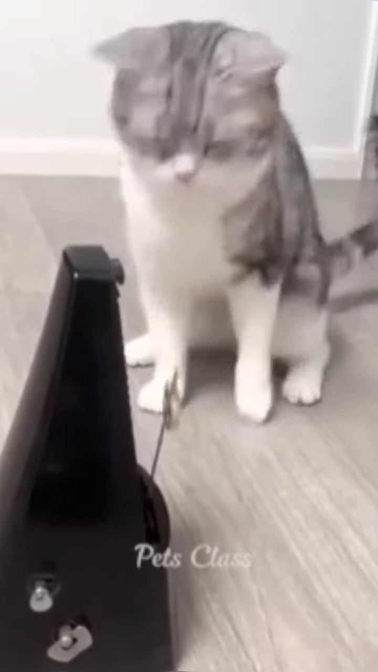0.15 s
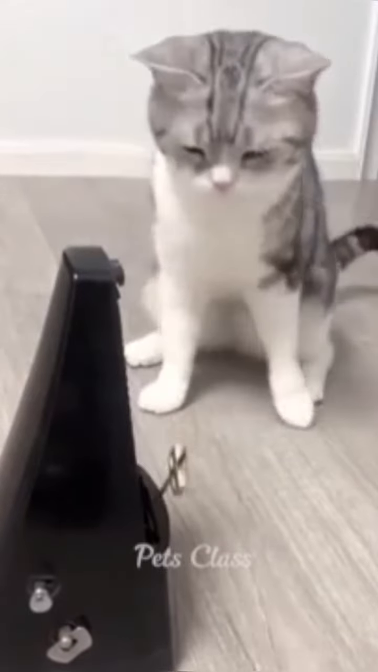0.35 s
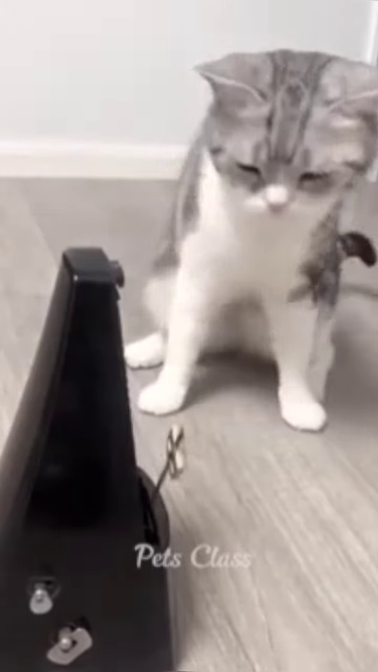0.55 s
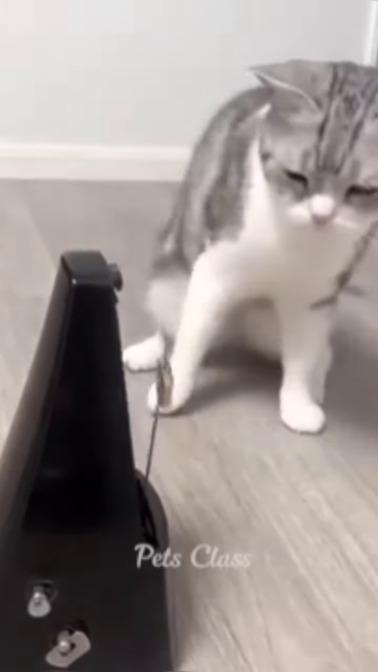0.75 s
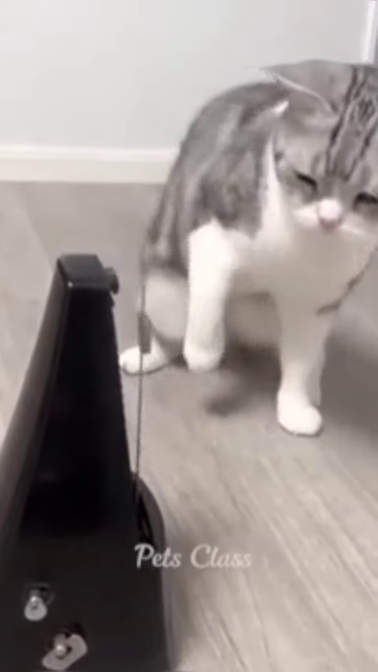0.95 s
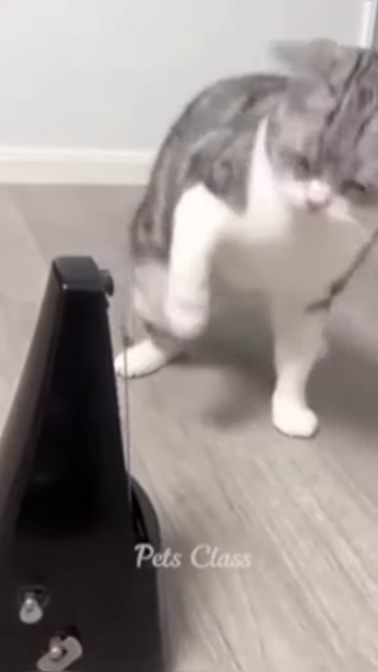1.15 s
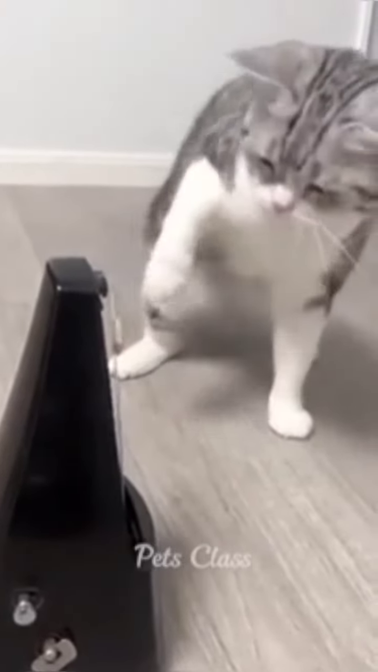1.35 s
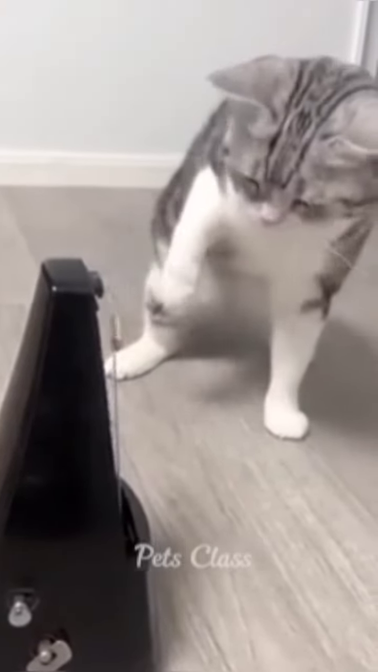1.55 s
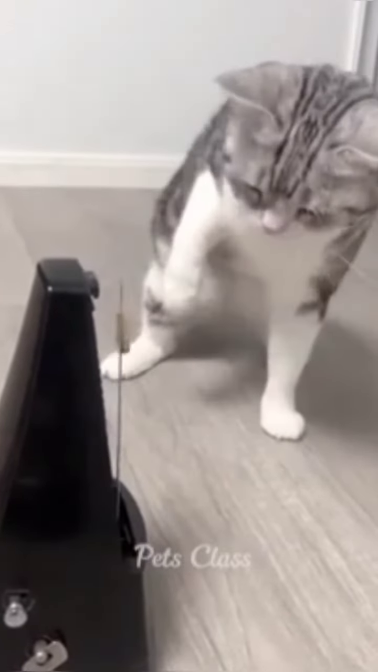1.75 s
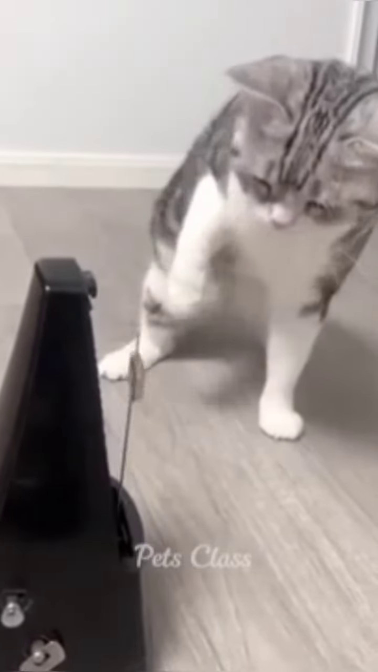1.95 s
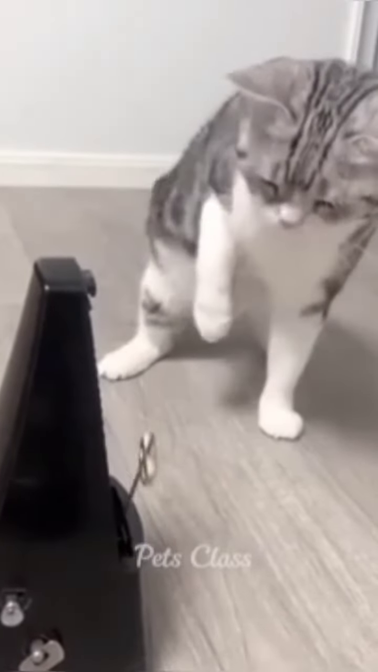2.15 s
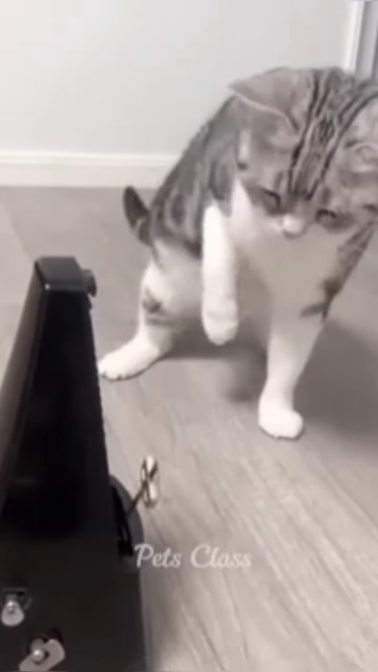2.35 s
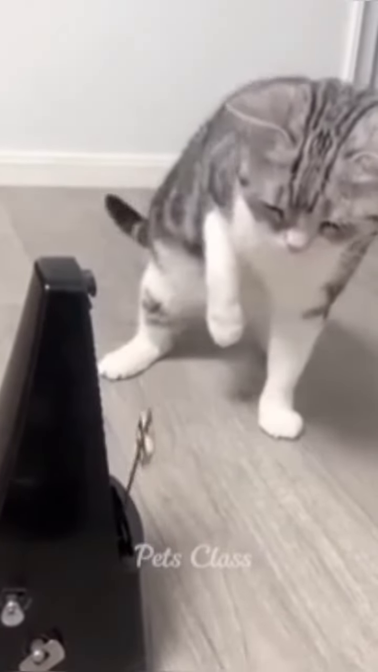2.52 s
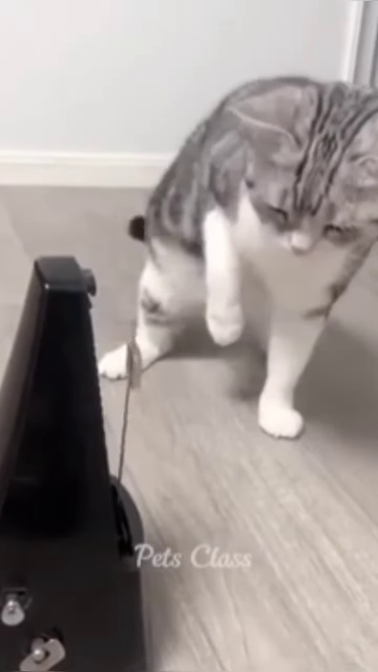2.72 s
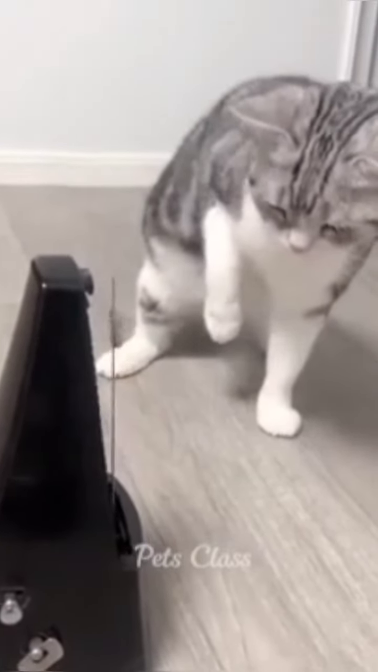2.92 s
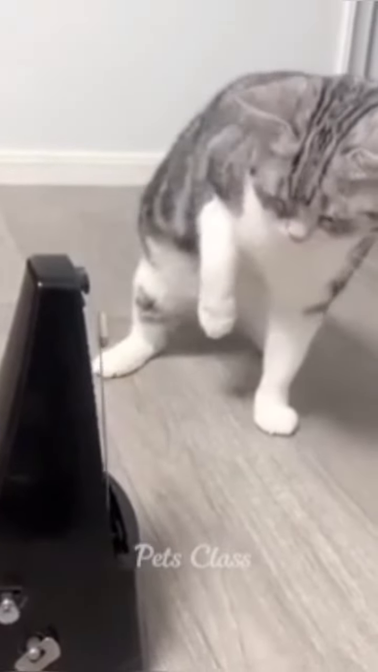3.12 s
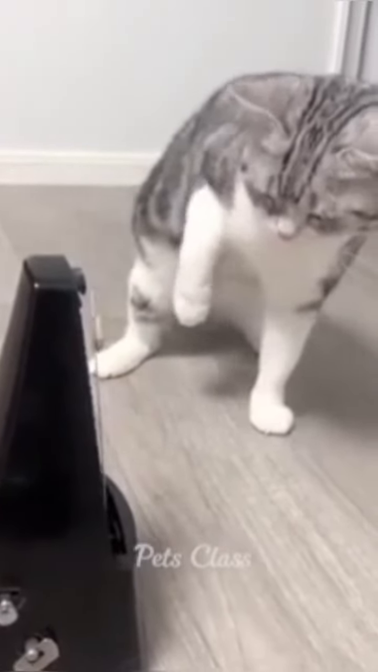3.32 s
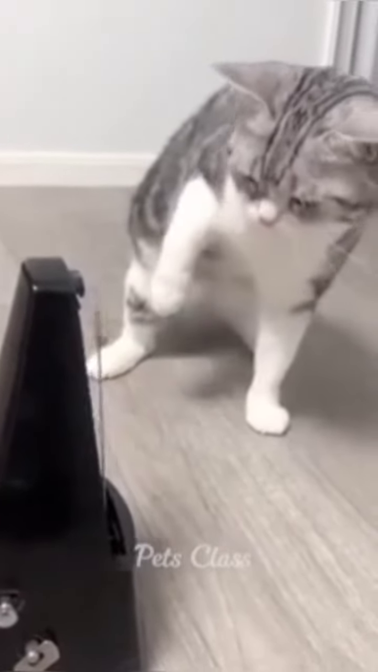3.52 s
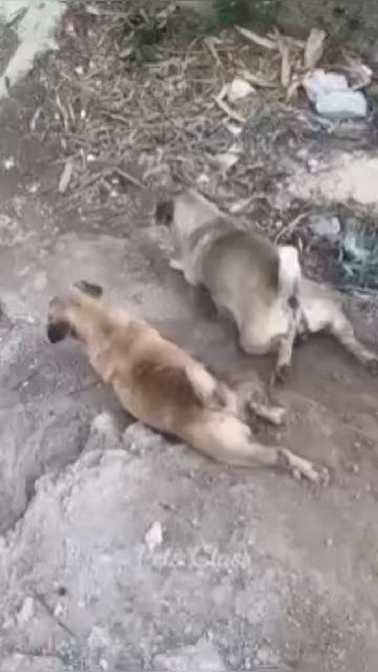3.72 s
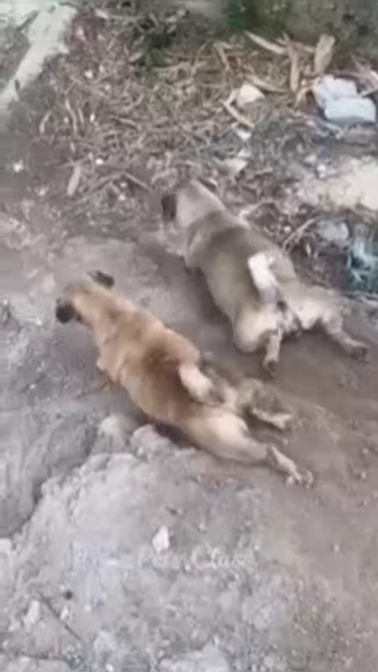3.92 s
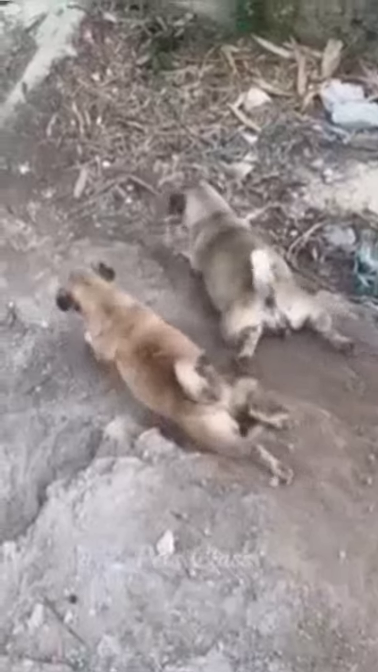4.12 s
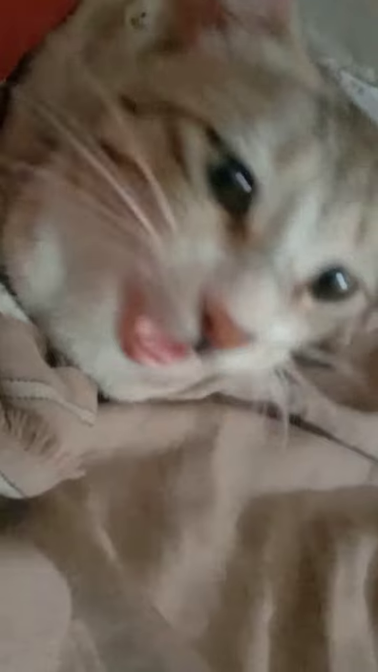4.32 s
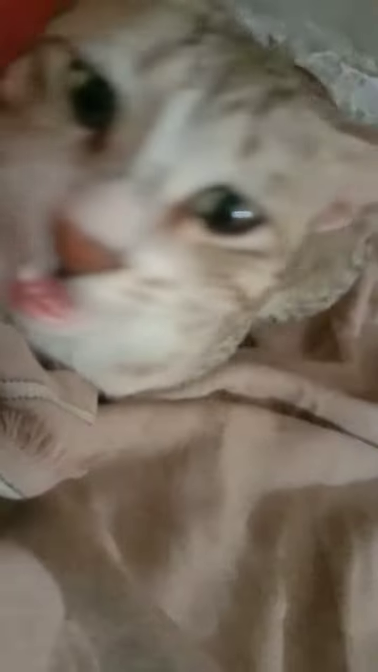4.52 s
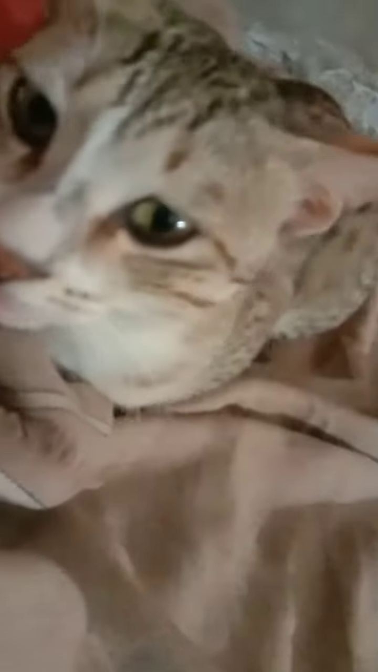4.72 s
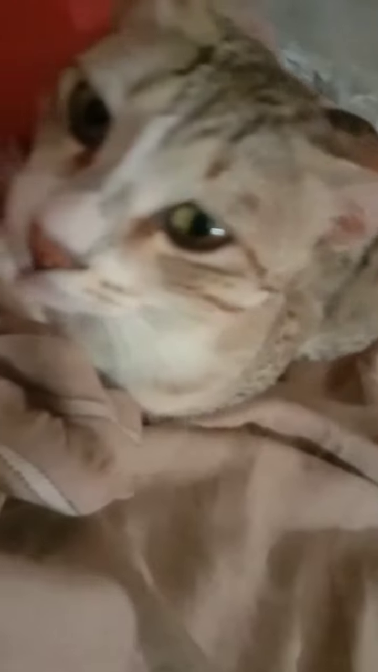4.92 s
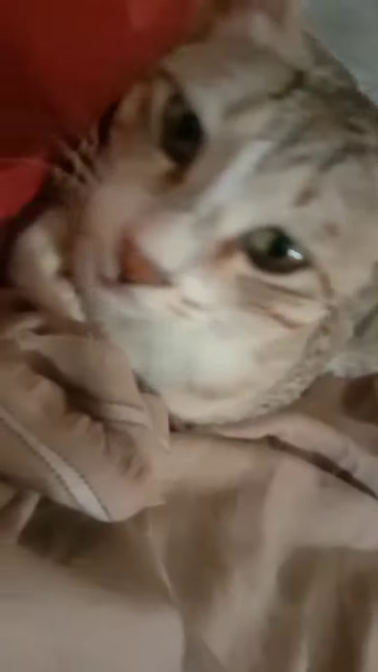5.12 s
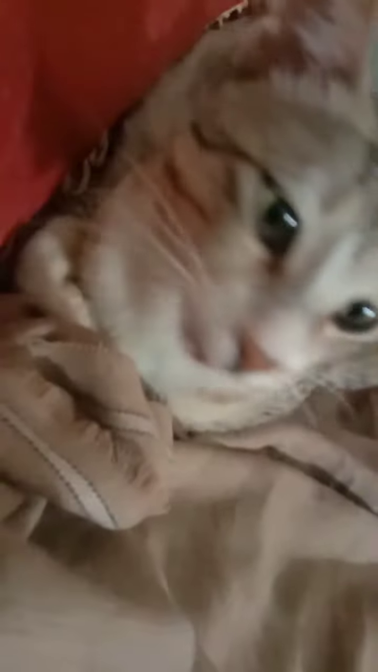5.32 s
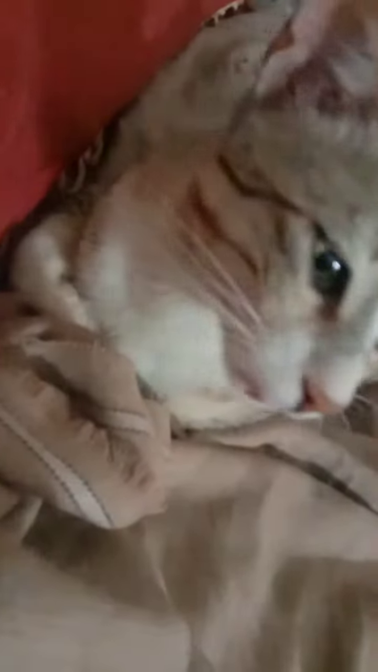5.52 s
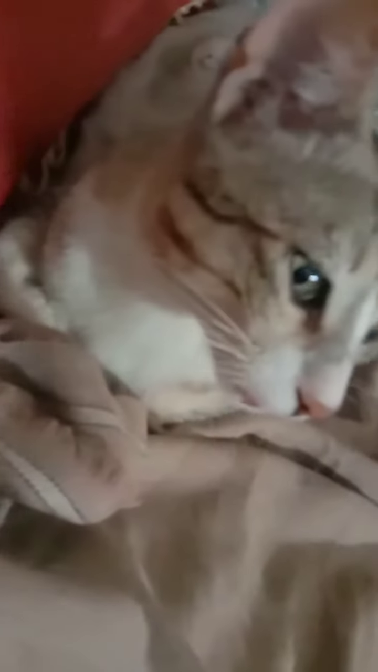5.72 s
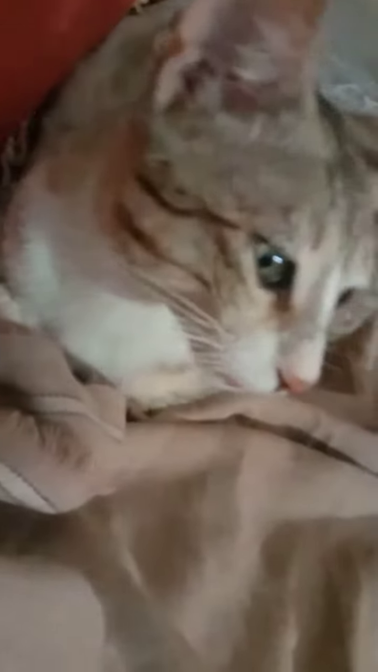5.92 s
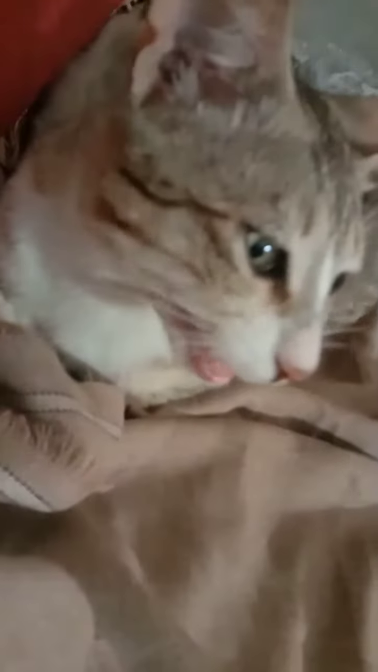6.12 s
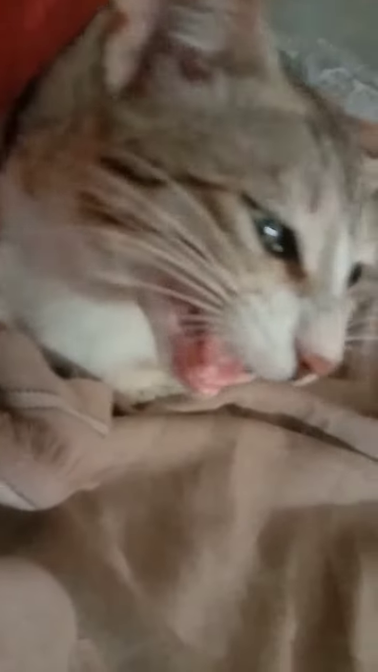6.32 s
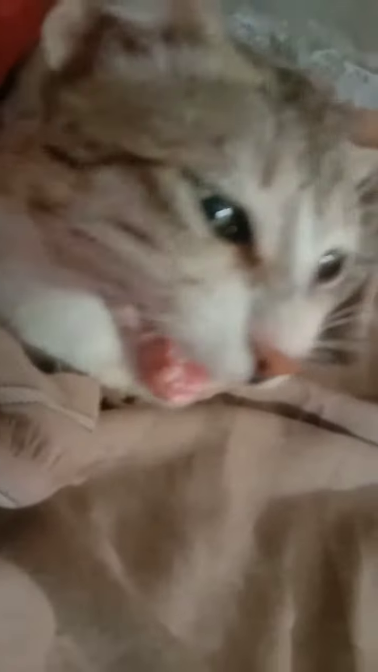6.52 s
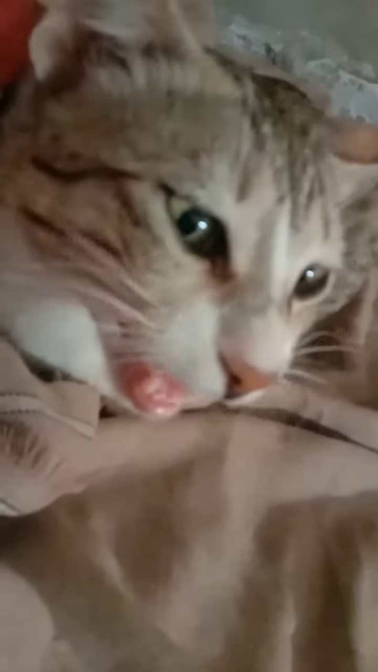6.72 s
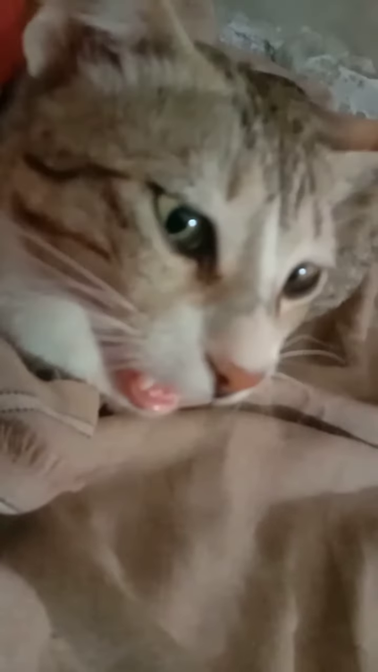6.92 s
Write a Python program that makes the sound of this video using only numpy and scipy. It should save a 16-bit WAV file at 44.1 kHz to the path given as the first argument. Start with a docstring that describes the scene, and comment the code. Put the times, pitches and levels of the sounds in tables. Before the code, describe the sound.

In a bare, reverberant room, a mechanical metronome gives four sharp, loud ticks roughly one second apart, each with a hollow case ring and short echo over faint hum and buzz. A soft thump follows the last tick. Everything cuts to brief silence, then a cat close to the microphone meows, shifts on cloth with rustles and dull bumps, and begins a second, louder meow.

```python
"""A clockwork metronome ticks four times in a bare room: each blow cracks, rings its case, echoes and reverberates.
Low hum, air noise and a thin buzz lie beneath it; a soft thump, a sinking tone, follows the last tick.
After a moment of silence, a cat on a blanket close to the microphone meows, its harmonics gliding through
moving mouth resonances. It shifts on the cloth, heard as strokes of coloured noise with dull bumps,
and starts a second, louder meow. Two faint clicks are short bursts of filtered noise."""
import sys
import numpy as np
from scipy import signal
from scipy.fft import rfft, irfft, next_fast_len
from scipy.io import wavfile
from scipy.ndimage import uniform_filter1d

SR = 44100
rng = np.random.default_rng(int(sys.argv[2]) if len(sys.argv) > 2 else 0)


def inscribe(sig):
    """Save sig as 16-bit PCM at rate SR to the path in sys.argv[1].

    A 1-D sig is mono; a 2-D sig holds one channel per row.
    Samples are clipped to [-1, 1] before scaling.
    """
    pcm = np.round(np.clip(np.atleast_2d(sig).T, -1, 1) * 32767)
    wavfile.write(sys.argv[1], SR, pcm.astype(np.int16))


N = 306495
TIME = np.arange(N) / SR
ROOM_END_S, BED_START_S = 3.815, 4.286
TOP_HZ = 15600  # upper limit of the microphone's range


def undb(db):
    """Decibels to gain."""
    return 10 ** (np.asarray(db) / 20)


def unit(x):
    """Scale to rms 1."""
    return x / np.sqrt(np.mean(x ** 2))


def lookup(table, hz):
    """Read (Hz, value) points on a log-frequency axis."""
    points, values = np.transpose(table)
    return np.interp(np.log(np.maximum(hz, 1)), np.log(points), values)


def noise(colour):
    """Noise of rms 1 with the given colour."""
    size = next_fast_len(N, real=True)
    white = rfft(rng.standard_normal(size))
    gains = undb(lookup(colour, np.fft.rfftfreq(size, 1 / SR)))
    return unit(irfft(white * gains, size)[:N])


def walk(rate):
    """Smoothed random steps of rms 1 that change about rate times a second."""
    step = max(int(SR / rate), 1)
    held = rng.standard_normal(N)[np.arange(N) // step]
    return unit(uniform_filter1d(held, step))


def add(out, s, sound):
    """Mix a sound in at time s."""
    i = int(round(s * SR))
    out[i:i + len(sound)] += sound[:len(out) - i]


def patchy(x, spread_db, rate, count=10):
    """Let each two-thirds-octave band of a sound swell and fade on its own."""
    size = next_fast_len(N, real=True)
    spectrum, hz = rfft(x, size), np.fft.rfftfreq(size, 1 / SR)
    centres = np.geomspace(100, 6400, count)
    # overlapping band weights that add up to 1
    bands = (irfft(spectrum * lookup(np.c_[centres, row], hz), size)[:N] for row in np.eye(count))
    return sum(band * undb(spread_db * walk(rate)) for band in bands)


def room_tone(air_db=-46, waver_db=2.0, buzz_db=-61.0, buzz_hz=199.96):
    """Steady air noise, a wavering hum and a thin electric buzz of evenly spaced pulses."""
    # colour of the room's air: (frequency [Hz], relative level [dB per Hz])
    air_colour = [(20, -47.5), (35, -25), (50, -11.5), (72, -12.5), (120, -7.5), (165, -9.5), (204, -7.5),
                  (310, -15.5), (1080, -13.5), (2300, -26.5), (3630, -32.5), (6050, -39.5), (7500, -40.5),
                  (15500, -50)]
    # hum tones: (frequency [Hz], rms level before wavering [dB])
    hum_tones = [(69.8, -49.5), (99.6, -55.5)]
    # colour of the mains buzz: (frequency [Hz], relative level [dB])
    buzz_colour = [(1500, -11.5), (2900, 3), (3400, -8.5), (4100, -0.5), (4800, -16), (6200, -12.5),
                   (7400, -5.5), (8400, -12.5), (9000, -15), (10000, -21.5), (15000, -30.5)]
    hum = 0
    for hz, db in hum_tones:
        level = undb(db + waver_db * walk(7))
        hum = hum + level * np.sin(2 * np.pi * hz * TIME + .4 * walk(8.8))
    lines_hz = np.arange(buzz_colour[0][0] // buzz_hz, TOP_HZ // buzz_hz) * buzz_hz
    # cosines in phase line up into pulses
    buzz = sum(undb(lookup(buzz_colour, hz)) * np.cos(2 * np.pi * hz * TIME) for hz in lines_hz)
    return undb(air_db) * noise(air_colour) + np.sqrt(2) * hum + undb(buzz_db) * unit(buzz)


def blanket(air_db=-49, patchy_db=2.5, restless_db=1.5, crossover_hz=450, rumble_db=-4, growth_db_per_s=3.0):
    """Cloth slides in strokes that swell and fade, over a quiet background whose low rumble slowly grows."""
    # colour of the sliding cloth: (frequency [Hz], relative level [dB per Hz])
    cloth_colour = [(59, -61.5), (100, -29.5), (262, -12.5), (383, -41), (524, -6), (594, -9), (703, -7),
                    (831, -11.5), (1290, -4), (1490, -9), (3760, -30.5), (7830, -79.5), (15000, -76)]
    # background at the cat's bed: (frequency [Hz], relative level [dB per Hz])
    bed_colour = [(18, -57.5), (30, -19.5), (202, -1.5), (315, -1.5), (561, -13.5), (691, -6),
                  (1050, -13.5), (1260, 0), (1550, -16.5), (1910, -8), (2180, -18.5), (4090, -32.5),
                  (5450, -37.5), (8060, -58), (15500, -42)]
    # strokes as the cat shifts: (time of peak [s], level [dB], rise constant [s], fade constant [s])
    stroke_table = [(4.3, -46.5, .1, 0.75), (4.76, -44, 0.14, 0.17), (5.02, -45, 0.08, .17),
                    (5.24, -39, 0.07, 0.15), (5.49, -50.5, 0.068, 0.24), (5.77, -55, 0.043, 0.032),
                    (5.94, -53, .03, .04), (6.47, -48.5, 0.097, 0.88)]
    strokes = []
    for s, db, rise_s, fade_s in stroke_table:
        distance = np.maximum((s - TIME) / rise_s, (TIME - s) / fade_s)
        strokes.append(undb(db) * np.exp(-distance))
    slide = noise(cloth_colour) * np.linalg.norm(strokes, axis=0)  # strokes add in power
    air = undb(air_db) * noise(bed_colour)
    rumble = signal.sosfiltfilt(signal.butter(2, crossover_hz, fs=SR, output="sos"), air)
    stir_db = rumble_db + growth_db_per_s * (TIME - BED_START_S) + restless_db * walk(19)
    # the air already holds the rumble once
    return patchy(slide + air + rumble * (undb(stir_db) - 1), patchy_db, rate=20)


def clicks():
    """Faint, short bursts of treble: octave-wide noise that dies away exponentially."""
    # clicks: (time [s], rms level before decay [dB], centre [Hz], decay constant [s])
    click_table = [(1.477, -41, 4800, 0.0084), (6.455, -50, 3500, 0.0056)]
    out, t = np.zeros(N), TIME[:SR // 20]
    for s, db, hz, decay_s in click_table:
        band = signal.butter(2, [hz / np.sqrt(2), hz * np.sqrt(2)], "band", fs=SR, output="sos")
        burst = unit(signal.sosfilt(band, rng.standard_normal(len(t))))
        add(out, s, burst * undb(db) * np.exp(-t / decay_s))
    return out


def bumps():
    """Dull bumps whose tone sinks as the soft contact spreads."""
    # bumps: (time [s], peak level before decay [dB], first pitch [Hz], last pitch [Hz], t60 [s])
    bump_table = [(3.397, -25.5, 294, 80, 0.15), (4.854, -32, 730, 454, 0.033),
                  (5.573, -35.5, 343, 267, 0.056), (5.764, -40.5, 294, 211, 0.14),
                  (6.195, -36, 330, 251.5, 0.11)]
    out, t = np.zeros(N), TIME[:SR // 4]
    for s, db, first_hz, last_hz, t60 in bump_table:
        hz = last_hz + (first_hz - last_hz) * np.exp(-t / 0.006)
        tone = np.sin(2 * np.pi * np.cumsum(hz) / SR)
        add(out, s, tone * undb(db - 60 * t / t60) * (1 - np.exp(-t / 0.00033)))
    return out


def arch(age, rise_s, length_s, first, top, last, exponent):
    """Climb from first to a rounded top, then fall to last along a power law."""
    rising = np.clip(1 - age / rise_s, 0, 1)
    falling = np.clip((age - rise_s) / (length_s - rise_s), 0, 1)
    return top + (first - top) * rising ** 2 + (last - top) * falling ** exponent


def gesture(call, mouth, close_s=.19, shut_first_hz=1250):
    """Pitch arches; level and first resonance follow the jaw; the second resonance lifts, then sinks."""
    start_s, length_s, level_db, swell_db_per_s, rise_s, first_hz, top_hz, last_hz, exponent = call
    open_s, open_hz, drift_hz_per_s, brighten_s, early_hz, bright_hz, dark_hz, darken_exponent = mouth
    # midway through the long meow the cat pushes again, which lifts pitch and level
    push_at_s, push_length_s, push_hz, push_db_per_s = 6.645, 0.096, 21.8, 28.5
    age = TIME - start_s
    jaw = np.sin(np.pi / 2 * np.clip(np.minimum(age / open_s, (length_s - age) / close_s), 0, 1))
    push = np.clip((TIME - push_at_s) / push_length_s, 0, 1)
    pitch = arch(age, rise_s, length_s, first_hz, top_hz, last_hz, exponent) + push_hz * push
    swell_db = swell_db_per_s * np.clip(age - open_s, 0, length_s)
    push_db = push_db_per_s * np.maximum(TIME - push_at_s, 0)
    gain = jaw * undb(level_db + swell_db + push_db)
    first = shut_first_hz + (open_hz - shut_first_hz) * jaw + drift_hz_per_s * age
    second = arch(age, brighten_s, length_s, early_hz, bright_hz, dark_hz, darken_exponent)
    return pitch, gain, jaw, first, second


def meow(call, mouth, throat, first_db, first_width_hz, second_db, second_width_hz, jitter, rasp,
         wander_db=2.3, shut_tilt_db_per_octave=-1.5, count=27):
    """The harmonics of the vocal folds slide through two moving mouth resonances."""
    pitch, gain, jaw, first_hz, second_hz = gesture(call, mouth)
    on = gain > 0
    # the folds are least steady while the voice is weak
    unsteady = np.minimum(np.sqrt(gain.max() / gain[on]), 4)
    hz = pitch[on] * (1 + unsteady * (jitter * walk(70) + rasp * walk(900))[on])
    shimmer_db = .5 * walk(60)
    partial_hz = np.arange(1, count + 1)[:, None] * hz
    first = first_db / (1 + ((partial_hz - first_hz[on]) / first_width_hz) ** 2)
    second = second_db / (1 + ((partial_hz - second_hz[on]) / second_width_hz) ** 2)
    # as the head turns, each partial swells and fades a little on its own, the high ones most
    drifts = np.array([walk(11)[on] for _ in range(count)])
    wander = wander_db * np.minimum(np.sqrt(partial_hz / 1800), 2) * drifts
    # a closing jaw dulls the voice
    muffle = shut_tilt_db_per_octave * (1 - jaw[on]) * np.log2(partial_hz / hz)
    gains = undb(lookup(throat, partial_hz) + first + second + muffle + wander)
    gains = gains / np.sqrt(np.sum(gains ** 2, axis=0) / 2)  # the jaw and breath alone set the level
    # each partial passes the throat with its own lag
    phase = 2 * np.pi * (np.cumsum(partial_hz, axis=1) / SR + rng.random((count, 1)))
    out = np.zeros(N)
    out[on] = np.sum(gains * np.sin(phase), axis=0)
    return out * gain * undb(shimmer_db)


def cat(hiss_db=-40, wet_db=-25, t60=0.54):
    """Two clear meows with a little hiss riding on them; near walls make each gliding harmonic swell and fade."""
    # meows: (start [s], length [s], level before swell and push [dB], swell [dB per s], pitch rise [s],
    # first pitch [Hz], top pitch [Hz], last pitch before push [Hz], fall exponent [1 straight, 2 arched])
    calls = [(4.283, .57, -32.5, -26, .29, 428.6, 590.4, 481, 2),
             (6.316, .8, -27.5, -8, .099, 564.4, 646.8, 498, 1.0)]
    # mouth in each meow: (jaw opening [s], first resonance when open, before drift [Hz], its drift [Hz per s],
    # second resonance: rise [s], first [Hz], top [Hz], last [Hz], fall exponent)
    mouths = [(0.26, 1840, -150, 0.25, 2020, 2180, 1570, 3.3), (.2, 1232, 400, .19, 2335, 2670, 1640, 0.62)]
    # colour of the voice in each meow: (frequency [Hz], relative level [dB])
    throat_first = [(550.0, -5), (1200.0, -3.5), (2000.0, -21), (2800.0, -2), (3600.0, -11), (4300.0, -16),
                    (5100.0, -30.5), (6200.0, -28.5), (7200.0, -32), (8200.0, -47.5), (10000.0, -38),
                    (13000.0, -47.0), (15000.0, -25)]
    throat_second = [(550, 1), (1200, -1.5), (2000, -8), (2500, -11.5), (2800, -1), (3000, -12),
                     (3200, -4.5), (3600, -3.5), (4300, -12.5), (5100, -28), (6200, -24), (7100, -23.5),
                     (8200, -54.5), (10000, -38.5), (13000, -47.5), (15000, -20)]
    hiss_colour = [(400, -18.5), (2100, -4), (2900, -15.5), (4200, -7.5), (6500, -25.0), (8500, -24.0),
                   (12500, -14.5), (15000, -9)]  # (frequency [Hz], relative level [dB per Hz])
    voice = meow(calls[0], mouths[0], throat_first, first_db=21.5, first_width_hz=700,
                 second_db=22.5, second_width_hz=172, jitter=0.0022, rasp=0.0013)
    voice = voice + meow(calls[1], mouths[1], throat_second, first_db=16.5, first_width_hz=250,
                         second_db=26, second_width_hz=530, jitter=0.0017, rasp=0.0014)
    hiss = noise(hiss_colour) * uniform_filter1d(np.abs(voice), size=400)
    t = TIME[:SR // 3]
    walls = unit(rng.standard_normal(len(t)) * undb(-60 * t / t60)) / np.sqrt(len(t))
    return voice + undb(hiss_db) * hiss + undb(wet_db) * signal.fftconvolve(voice, walls)[:N]


def tick(treble_db, lag_s=0.0061, lag_hz=680, crack_db=-13.5, crack_s=.0035, rise=0.068, low_hz=330):
    """One blow: the escapement cracks and the case rings; the slow bending waves of its panels arrive late."""
    # modes struck by each blow: (frequency [Hz], level before swell and decay [dB], t60 [s]); the last six,
    # long-ringing rows are modes of the room, the rest belong to the metronome's case
    struck_modes = [(330, -23.5, 0.14), (373, -18, 0.13), (561, -5.5, .017), (778, -6, 0.031),
                    (1030, -10.5, 0.014), (1260, -6, 0.02), (1393, -9, 0.028), (2018, -17, 0.069),
                    (2242, -11.5, 0.031), (2280, -14, 0.027), (3450, -6.5, 0.026), (3810, -5.5, 0.02),
                    (4090, -10, 0.022), (4830, -15, 0.025), (5280, -9, 0.014), (6390, -16.5, 0.033),
                    (6840, -13.5, 0.016), (7940, -14.5, 0.016), (9160, -13.5, .018), (11400, -11.5, .019),
                    (12300, -23.5, 0.009), (868, -35.5, 0.55), (931, -33.5, 0.76), (1024, -38, 0.65),
                    (1282.5, -37, 0.63), (2270, -39, 0.25), (3500, -40, 0.3)]
    t = TIME[:SR // 2]
    modes = 0
    for hz, db, t60 in struck_modes:
        swell = 1 - np.exp(-t / (rise * t60))
        struck_hz = hz * (1 + 0.0012 * rng.standard_normal())
        modes = modes + np.sin(2 * np.pi * struck_hz * t) * swell * undb(db - 60 * t / t60)
    crack = undb(crack_db) * rng.standard_normal(len(t)) * np.exp(-t / crack_s)
    # the small case radiates no bass
    blow = signal.sosfilt(signal.butter(4, low_hz, "high", fs=SR, output="sos"), modes + crack)
    hz = np.fft.rfftfreq(len(t), 1 / SR)
    # low frequencies lag by up to lag_s, high ones hardly at all
    dispersion = np.exp(-2j * np.pi * lag_s * lag_hz * np.arctan(hz / lag_hz))
    treble = undb(treble_db * hz / (hz + 4000))
    return irfft(rfft(blow) * dispersion * treble, len(t)) * (1 - t / t[-1])


def room_ring(ring_db=-24.0, build_s=0.0045, early_db=3, early_s=.02):
    """The diffuse ring after a blow: it builds up quickly, and its high treble dies first."""
    # colour of the ring: (frequency [Hz], relative level [dB per Hz])
    ring_colour = [(150, -19.5), (270, -18), (360, -6.5), (480, -13), (700, -3.5), (950, 1.5), (1300, -4),
                   (1750, -9), (2200, -7), (2950, -16), (3700, -8.5), (4600, -17.5), (6500, -20),
                   (11500, -23), (15500, -25)]
    # decay of the ring: (frequency [Hz], t60 [s])
    ring_decay = [(300, 0.55), (900, 0.5), (2500, 0.56), (4000, 0.52), (7000, 0.42), (14000, 0.23)]
    t = TIME[:SR]
    spectrum, hz = rfft(noise(ring_colour)[:SR]), np.fft.rfftfreq(SR, 1 / SR)
    centres, t60s = np.transpose(ring_decay)
    ring = 0
    for row, t60 in zip(np.eye(len(centres)), t60s):
        share = lookup(np.c_[centres, row], hz)
        ring = ring + irfft(spectrum * share, SR) * undb(-60 * t / t60)
    level = undb(ring_db + early_db * np.exp(-t / early_s))
    return ring * level * (1 - np.exp(-(t / build_s) ** 2))


def metronome():
    """Every tick takes the same paths through the room: direct, by echoes and as a diffuse ring."""
    # escapement blows: (time [s], level [dB], treble shelf [dB])
    blows = [(0.3451, 2.5, -4), (1.3439, 3, 0.5), (2.241, 3, -3.5), (3.2470, 2.5, -1.8)]
    # echoes from floor and walls: (delay [s], level relative to the blow [dB])
    echoes = [(.0108, -18), (.0127, -18.5), (.0147, -18), (.0490, -36), (.1225, -38), (.1510, -39.5)]
    out, ring = np.zeros(N), room_ring()
    for s, db, treble_db in blows:
        blow = undb(db) * tick(treble_db)
        add(out, s, blow)
        add(out, s, undb(db) * ring)
        for delay_s, echo_db in echoes:
            add(out, s + delay_s, undb(echo_db) * blow)
    return out


def scene():
    """The metronome's room, a silent gap, then the cat's bed."""
    in_room = uniform_filter1d(1. * (TIME < ROOM_END_S), size=200)
    on_bed = uniform_filter1d(1. * (TIME > BED_START_S), size=200)
    room = in_room * (room_tone() + metronome())
    bed = on_bed * (blanket() + cat())
    return (room + bed + clicks() + bumps())[None]


def record(dry):
    """The microphone drops the deepest bass, peaks clip at full scale, and the top is cut."""
    no_bass = signal.sosfilt(signal.butter(4, 32, "high", fs=SR, output="sos"), dry)
    clipped = np.clip(no_bass, -1, 1)
    return signal.sosfilt(signal.ellip(10, .2, 80, TOP_HZ, fs=SR, output="sos"), clipped)


dry = scene()
out = record(dry)
inscribe(out)
```